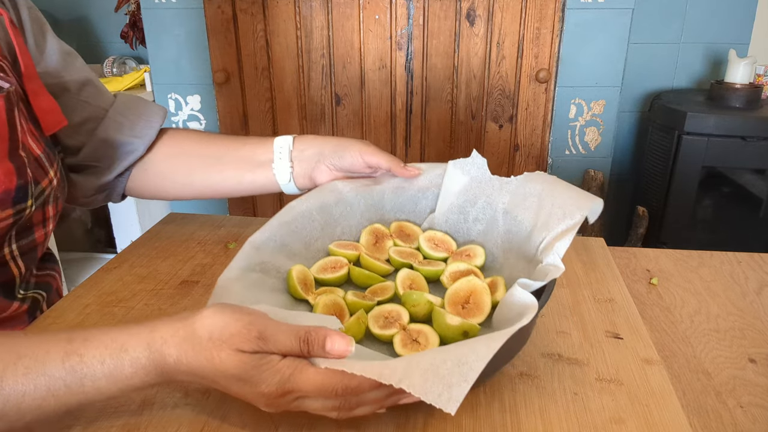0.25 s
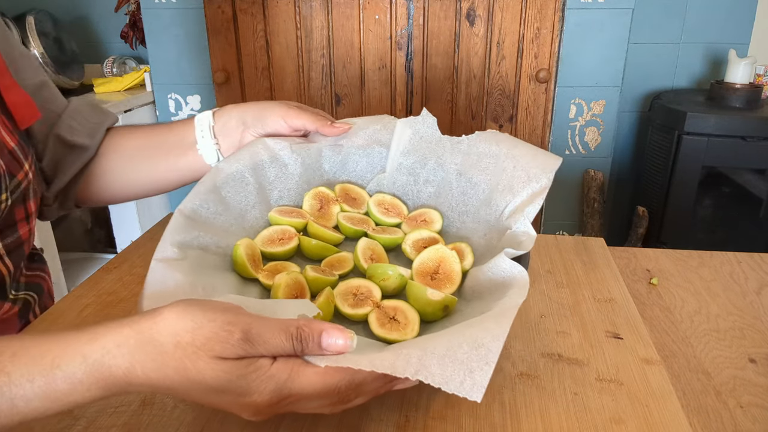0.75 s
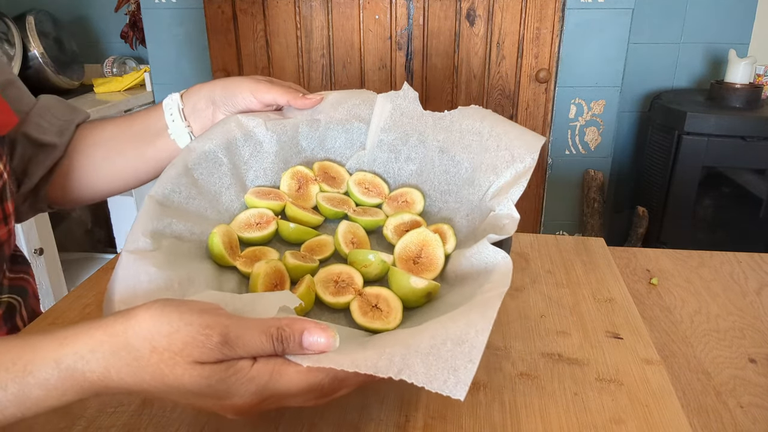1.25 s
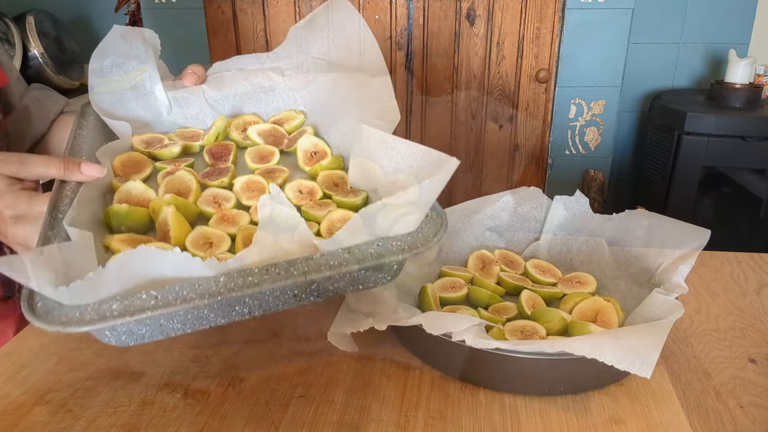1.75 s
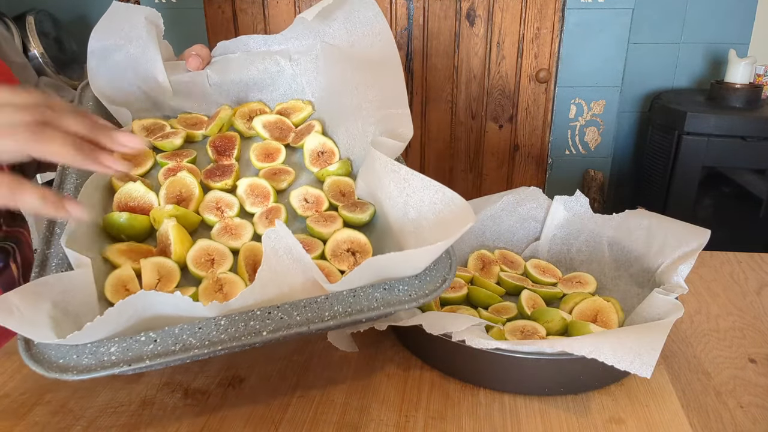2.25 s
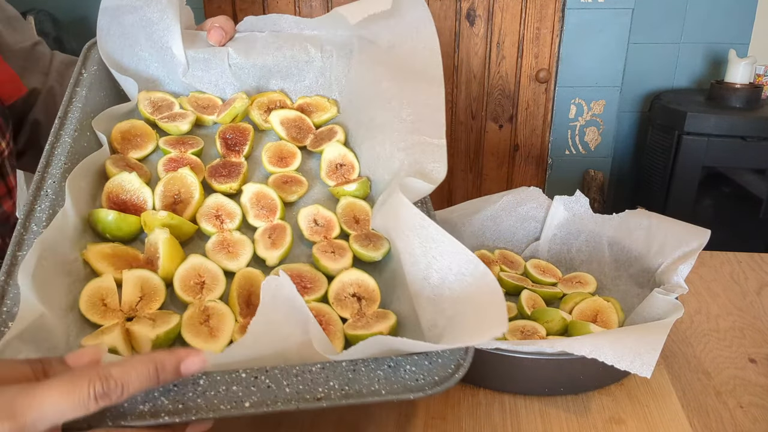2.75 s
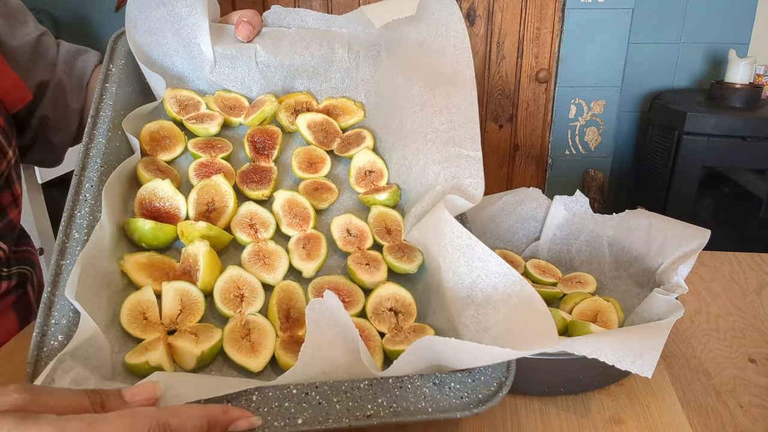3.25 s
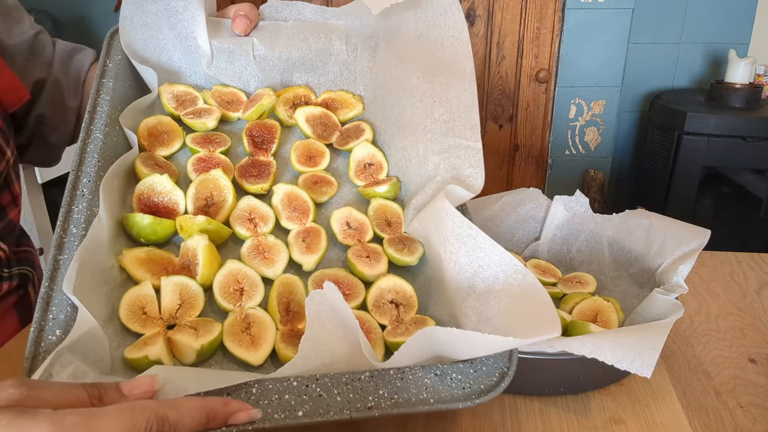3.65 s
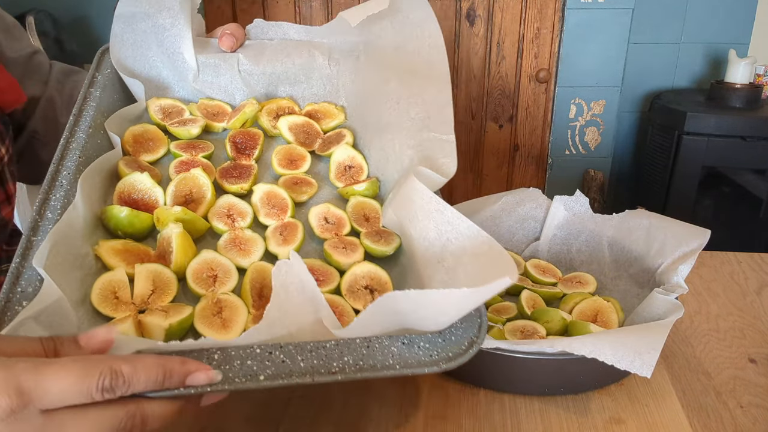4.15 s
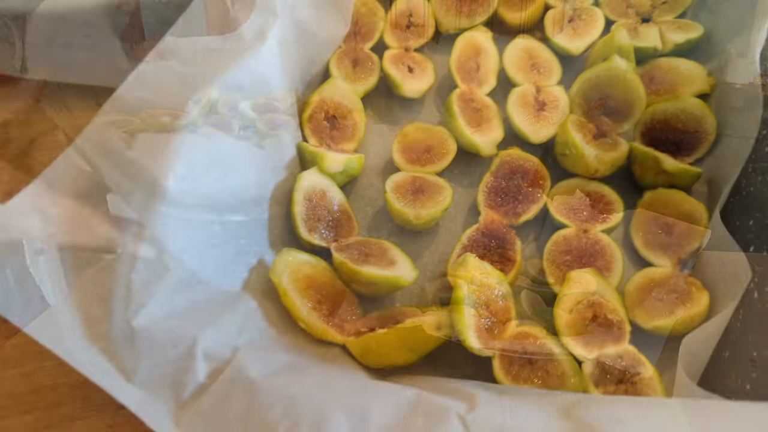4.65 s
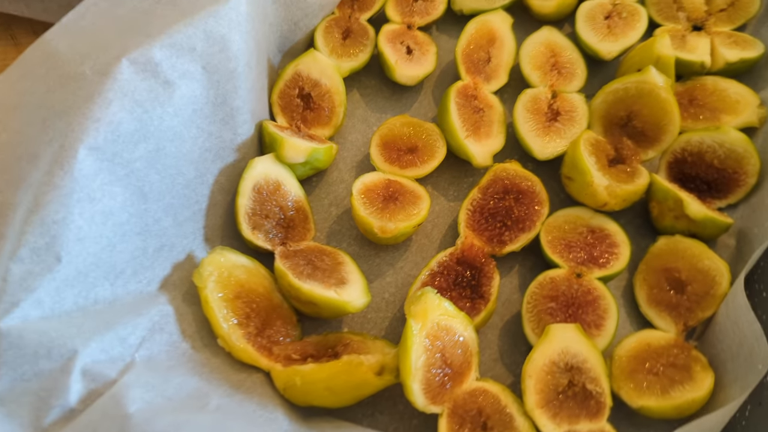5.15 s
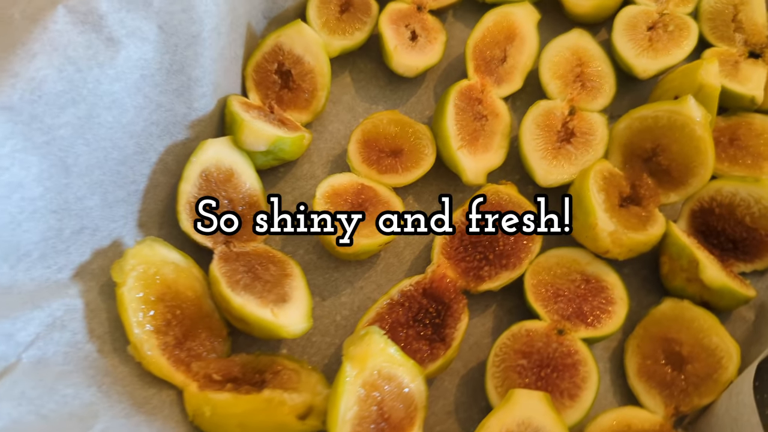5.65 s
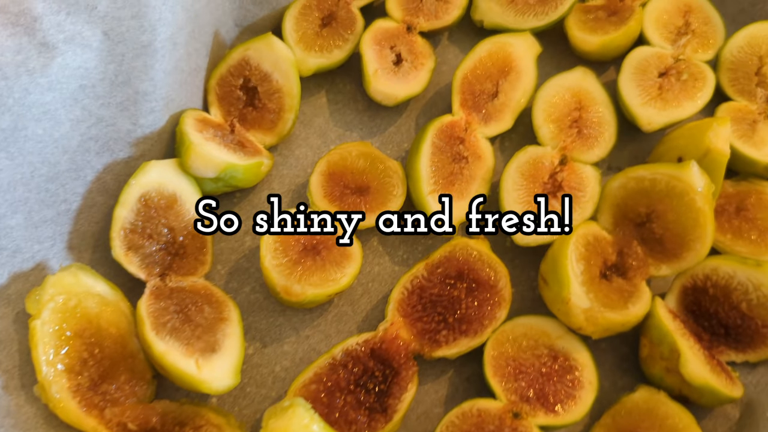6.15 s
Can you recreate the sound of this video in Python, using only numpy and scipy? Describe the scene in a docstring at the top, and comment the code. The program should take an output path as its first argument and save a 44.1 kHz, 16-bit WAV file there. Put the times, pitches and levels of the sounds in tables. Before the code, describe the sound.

Dry, crisp paper crinkling close to the microphones: sharp folding pops over a fine sliding crackle, the parchment rubbing on metal trays that give muffled knocks and a low boom. The strongest burst comes before halfway, then sparse rustles and a short final swish. Afterwards there is only faint appliance hum, air and hiss in a small live kitchen, with one tiny click near the end.

```python
"""Trays of cut fruit on baking parchment

Close by, metal trays of fruit are lifted and tilted over a kitchen table, heard by a pair of ears.
The parchment snaps in noise bursts shaped by each fold and slides in a fine crackle of tiny creases.
The trays boom as low noise and ring in damped modes; one small hard click comes near the end on the left.
Diffuse echoes give the hard-walled kitchen; wavering sines and noise give appliance hum, air and hiss."""
import sys
import numpy as np
from scipy import signal
from scipy.fft import rfft, irfft, next_fast_len
from scipy.io import wavfile
from scipy.ndimage import map_coordinates

SR = 44100
rng = np.random.default_rng(int(sys.argv[2]) if len(sys.argv) > 2 else 0)


def bounce(signal):
    """Save signal as a 16-bit WAV file at the path given by the first command-line argument."""
    frames = np.transpose(np.atleast_2d(signal))
    limited = np.clip(frames, -1, 1)
    pcm = np.round(limited * 32767).astype(np.int16)
    wavfile.write(sys.argv[1], SR, pcm)


N = 282636

# Large folds that snap through: (time [s], relative level [dB], fold pitch [Hz], body [dB], sheen [dB],
# time to crest [ms])
SNAPS = [(0.009, -43, 2000, -2, 1, 1), (0.026, -39.5, 2200, 5, -5, 1.4), (0.0582, -37.5, 1800, -5, -9, 1.3),
         (0.0675, -44, 3600, -6, 0.5, .7), (0.0849, -29.5, 1800, -6.5, 0, 0.5),
         (0.1004, -37, 3200, -6, -1, .6), (0.170, -35, 2320, -1, 1, 2.1), (0.220, -39.5, 4400, -3, 4, 1.5),
         (0.3195, -44, 5200, -9, 4, 0.69), (0.324, -29.8, 2610, 4.5, 1, 1.4),
         (0.36, -40, 4400, 7, -11, 1.3), (0.436, -41.5, 4660, 2, 4, 1.4), (0.456, -46, 2000, -2, 0, 1.4),
         (0.4703, -36.5, 1900, 3, 8, 1.15), (0.482, -37, 1650, -1.5, -12, 1.1),
         (0.662, -54, 2000, -6, 0, 1.8), (0.668, -42.5, 3600, -4, 5.5, 1.2),
         (0.8977, -36, 5350, -18, 4, 1.2), (0.908, -35, 2200, 0, -0.5, 1.7),
         (1.086, -47.8, 2770, 4, -2, 2.2), (1.288, -44, 1950, -5, -20, 1.3),
         (1.303, -37.5, 4000, -13, 1, 1.01), (1.380, -47, 5500, -4, 2, 2.4),
         (1.4376, -35, 3700, -4.5, -2, 1.5), (1.447, -43, 5195, -6, 7, 0.91),
         (1.4859, -39, 5800, -6, 4, 1.8), (1.522, -34.5, 2900, -14, -4, 1.3),
         (1.5415, -36.5, 1500, -9, -3, 1.6), (1.5595, -38.5, 1900, -8, -3, 2.4),
         (1.5687, -26, 1450, -8, -3, .8), (1.577, -36.5, 2300, -5, -5, 1),
         (1.585, -38.5, 1800, -5, -5, 1.2), (1.616, -38.5, 2400, -8, -4, 1.08),
         (1.629, -42, 3000, -6, 2, 1), (1.702, -38, 1950, -6, -5, 1.6), (1.7205, -42.5, 1750, -6, -10, 1.2),
         (1.729, -37, 3490, -13, -3, 1.2), (1.7543, -39.5, 5500, -6, 4, 1),
         (1.766, -36.5, 1700, -5, -4, 1.3), (1.8148, -30.3, 3300, -6, 2, 1.7),
         (2.023, -35, 2050, -11, -5.5, 1.1), (2.0586, -47, 1900, -9, -4, 1),
         (2.138, -46.5, 4660, -6, -1.5, 1.4), (2.419, -38, 2200, -3, 3, 2.9), (2.449, -32, 5200, 0, 0, 2.9),
         (2.458, -36.5, 1900, -2, 1, 1.6), (2.4753, -26.5, 6230, -10.5, 4, 1),
         (2.4785, -26.5, 5554, -5, 2, 1.3), (2.4983, -24.5, 2010, -6.5, 6, 1.5),
         (2.5283, -32, 5550, -9, 6, 1.7), (2.5435, -32, 2190, -7, -2.5, 1.2),
         (2.559, -35, 2300, -6, -4, 1.2), (2.566, -31.5, 5550, -7.5, 6.5, 1.3),
         (2.5774, -33.5, 1800, -6, 0, 1.4), (2.7064, -33.5, 2300, -3, -3, 1.4),
         (2.7095, -24.7, 1750, -2.5, 5, 1.56), (2.718, -38, 1700, -2, -2, 1.2),
         (2.7534, -33, 1490, 0.5, -5, 2), (2.771, -38, 5800, -6, 3.5, 1.2),
         (2.8542, -30.5, 5550, -12, 9, 1.4), (2.9017, -29, 3800, -2, -2.5, 1.2),
         (2.917, -37, 3800, -2, -2, 1.4), (2.9287, -26, 3100, 3, -1, 1.9),
         (2.9397, -37, 4200, -4, 3.5, 1.1), (2.9815, -37, 1950, -8, 0, 1.3),
         (2.9871, -26.5, 4200, -9, 4.5, 1.7), (3.049, -41, 4150, 0, 4, 1.6),
         (3.2144, -42.5, 5500, 3, 12.5, 1.4), (3.3526, -53.5, 2300, 6, -5, 2.4),
         (3.4625, -32, 2100, -2, 6.5, 1.7), (3.850, -43.3, 1400, -1, -9, 2.4),
         (3.8604, -49.5, 3200, 2, -4, 1.8), (3.875, -52, 1500, 0, -14, 2.1),
         (4.195, -51, 1900, -6, -14, 2.5), (4.2035, -44, 4400, -3.5, -1, 1.3),
         (4.224, -51, 1900, -4, -9, 2.4), (4.3315, -32, 2820, -2, -1, 1.5), (4.436, -39, 5500, -2, -1, 2),
         (4.444, -35, 4420, 0, 2, 2.4), (4.4495, -34, 3000, 2, 1, 2.2), (4.455, -38.5, 3800, 3, -1, 2),
         (4.472, -38.5, 4900, -6, -4, 1.9), (4.540, -47.5, 4940, -5, 6, 1.5),
         (4.867, -54.5, 5500, -4, 3, 1.4), (4.980, -61, 2000, 4, -2, 1.7), (5.035, -59.5, 5000, 5, 1, 2.2),
         (5.0494, -56, 3000, 3, 8, .8)]
# Slackness of the sliding sheet: (time [s], mean midrange gain [dB])
SLACKNESS = [(0, 0), (1.3, 1), (2.0, 0.5), (2.25, -1.5), (2.5, 2), (3.0, -0.5), (3.4, 1), (3.9, 0),
             (4.2, 0), (4.4, -4)]
# Soft bumps of hand and fruit on the tray: (time [s], relative level [dB], reach of the contact [Hz])
BUMPS = [(.326, -54, 1300), (2.447, -48, 900), (2.468, -46, 900), (2.712, -47, 1800), (2.932, -47, 2200),
         (3.20, -56, 800), (3.28, -56, 800), (3.464, -50.5, 1000), (4.335, -58, 500), (4.443, -47, 700)]
# Modes of the loaded tray: (frequency [Hz], relative level [dB], t60 [s])
TRAY_MODES = [(299, -9.5, 0.13), (365, -3, .17), (425, -1.5, .15), (545, -4, .15), (771.7, 2, .19),
              (937, -2, .17), (1285, -4, .16), (1800, -1, .13), (2406, -2, .11), (3095, -3, .11),
              (3472, -2, .11), (3955, -4, .07), (6087, -1, .09)]
# A small hard click: (time [s], relative level [dB], time to crest [ms], pitch [Hz], body [dB], sheen [dB],
# right ear lag [ms], relative room level [dB])
CLICK = (6.1647, -39, 1.2, 3050, -1, 6.5, 0.1, 0)
# Colour of a buckling sheet: (frequency [Hz], relative level [dB per Hz])
BUCKLING_COLOUR = [(100, -33), (300, -12), (550, -3.5), (780, -1), (1000, -3), (1300, 0.5), (1900, 1),
                   (2800, -2.5), (3900, -2), (5100, -3), (6700, -2.2), (8000, -9.5), (12000, -12),
                   (16000, -15.8)]
# Colour of a sliding sheet: (frequency [Hz], relative level [dB per Hz])
SLIDING_COLOUR = [(100, -28), (300, -10), (550, -4), (780, -3.5), (1000, -5.5), (1250, 1), (1900, 1),
                  (2800, -2), (3900, -2.5), (5200, -5.5), (6700, -4.5), (8000, -10), (12000, -14.5),
                  (16000, -18)]
# Colour of the trays' boom: (frequency [Hz], relative level [dB per Hz])
BOOM_COLOUR = [(25, -42), (58, -17), (72, -5.5), (80, -3), (87, 5.5), (96, -5.5), (125, -12), (158, -7),
               (195, -18), (280, -20.5), (400, -18.5), (560, -18), (800, -21), (1300, -34.5), (2500, -56)]
# Colour of still kitchen air: (frequency [Hz], relative level [dB per Hz])
AIR_COLOUR = [(20, -30), (45, -3), (90, -1), (170, -2.5), (270, -4), (400, -5), (520, -12.5), (750, -14),
              (1200, -23.5), (2500, -30.5), (5000, -35), (16000, -52)]
# Colour of a faint electronic hiss: (frequency [Hz], relative level [dB per Hz])
HISS_COLOUR = [(1000, -6.5), (4800, -4.5), (6000, 1.5), (7600, -8), (8300, -7), (8800, 3), (9800, -10.5),
               (11000, -8), (11500, -1), (11900, -5), (12800, 1.5), (14500, -6), (16000, -6)]
# Appliance hum: (frequency [Hz], relative rms level [dB])
HUM_TONES = [(107.7, -72.5), (215.3, -68), (344.5, -71), (371.4, -66), (597.5, -80), (748.3, -81.5)]
# The steady background grows louder towards the end: (time [s], gain [dB])
BACKGROUND_GAIN = [(0, -5.5), (4.3, -5), (4.75, 0), (6.41, 0)]
# Likeness of the two ears in the room: (frequency [Hz], coherence [0-1])
EAR_COHERENCE = [(60, .95), (130, 0.95), (290, 0.81), (640, 0.6), (1000, 0.41), (1500, 0.29), (3000, .05),
                 (15000, .03)]
# The kitchen's ring: (frequency [Hz], t60 [s])
KITCHEN_T60 = [(200, .4), (800, .42), (2000, .48), (5500, 0.41), (9000, 0.35), (15000, 0.27)]
# Where the handled paper is: (time [s], mean right ear lag [ms])
PAPER_PLACE = [(0, -0.078), (1.1, -0.041), (1.3, 0.098), (2.9, .05), (3.9, -0.077), (4.4, 0.066)]
# Pushes that make the paper slide and crease: (crest time [s], relative level [dB], rise [s], fall [s],
# creasing [0-1], tautness [0-1])
SLIDES = [(.11, -46.5, .9, 0.17, 0.88, 0.8), (.37, -51.5, 0.31, 0.23, 0.79, 0.8),
          (.78, -70, .3, 0.47, 0.65, 0.5), (1.44, -47.5, 0.14, 0.24, .8, .9),
          (1.59, -46.5, .17, 0.13, .95, 1), (1.76, -48, 0.19, 0.23, .8, 1),
          (2.03, -58.5, 0.81, .2, .3, 0.91), (2.22, -53.5, .22, 0.17, 0.1, 0.78),
          (2.464, -37, 0.049, 0.1, 0.74, 1), (2.59, -48, .1, 0.28, .9, 1), (2.73, -47.5, .3, 0.3, .9, 1),
          (2.93, -55, 0.23, .17, 1, .8), (3.26, -57.8, 0.44, 0.43, 0.5, 0.1),
          (3.5, -56.5, .04, .2, .5, 0.3), (3.7, -69.5, .2, 0.27, .6, .1), (3.88, -57.5, 0.046, 0.13, .4, 0),
          (3.99, -58.5, 0.21, 0.21, 0.2, 0), (4.23, -58, .06, .15, .2, 0),
          (4.345, -41.3, 0.14, 0.16, .05, 1), (4.446, -39, .045, 0.029, .1, 1),
          (5.66, -70, 0.25, 0.18, 0.52, .15)]
# The trays flex as the grip shifts: (crest time [s], relative level [dB], rise [s], fall [s])
FLEXES = [(2.47, -52, 1.3, .6), (2.66, -51, .3, .2), (2.97, -53.5, 0.22, 0.67), (3.28, -56.5, 0.24, 1.2),
          (4.1, -53, 0.33, 0.18), (4.45, -57, .6, 0.32)]
# Boom of a tray that is only held: (time [s], relative level [dB])
HELD_BOOM = [(0, -66), (1, -70), (4.5, -69.5), (5.3, -76), (6.41, -73)]
# What the small hard thing rings with: (frequency [Hz], relative level [dB])
CLICK_MODES = [(1700, -9), (2340, -1), (4620, -8), (6230, -5), (6950, -5), (10000, -2), (12500, 0)]

TOP_HZ = 16000  # upper band limit
# Rise and fall are the times in which a movement changes by SWELL_DB; paper settles between pushes
SWELL_DB, SETTLE_DB = 20, -82.5
# Every fold: relative level of the room's answer [dB], scatter of its ear lag [ms]
FOLD_ROOM_DB, LAG_SCATTER_MS = -4, .04
# Small folds: chances a second, level over the slide [dB], its scatter [dB]
SMALL_RATE, SMALL_OVER_DB, SMALL_SCATTER_DB = 30, 3.5, 2
# Least slide level that starts them, cap on their level before scatter [dB]
SMALL_FROM_DB, SMALL_TOP_DB = -56, -42
# Their middle pitch [Hz], its scatter [octaves], body [dB], sheen [dB], time to crest [ms]
SMALL_HZ, SMALL_OCTAVES, SMALL_BODY_DB, SMALL_SHEEN_DB, SMALL_CREST_MS = 3300, 0.59, -3.5, .5, .8
# Tiny creases: chances a second, level over the slide [dB], spread of sizes [dB]
CREASE_RATE, CREASE_DB, CREASE_SPREAD_DB = 130, 1.5, 3.8
# Their middle pitch [Hz], its scatter [octaves], life [cycles]
CREASE_HZ, CREASE_OCTAVES, CREASE_CYCLES = 3000, .8, 2
# After a snap the fold goes on creasing: level under the snap [dB], time to die away by 60 dB [s]
RELAX_DB, RELAX_T60 = -18, .3


def crinkle(right_db=.5, count=5):
    """Folds snap one by one, answered from a few places on the sheet, a little stronger on the right."""
    out = np.zeros((2, N))
    places = [kitchen() for _ in range(count)]
    for k, (s, db, fold_hz, body_db, sheen_db, crest_ms) in enumerate(SNAPS + small_folds()):
        lag_ms = np.interp(s, *np.transpose(PAPER_PLACE)) + LAG_SCATTER_MS * rng.standard_normal()
        fold = snap(places[k % count], db, crest_ms, fold_hz, body_db, sheen_db, lag_ms, FOLD_ROOM_DB)
        add(out, s, fold)
    return out * amp([[-right_db], [right_db]])


def snap(room, db, crest_ms, fold_hz, body_db, sheen_db, lag_ms, room_db, width=0.57,
         flutter_db=-18, flutter_life=.004, fold_db=7.3, fold_octaves=0.32, lumpy_db=2.9,
         apart=.45, wet_db=-.5, size=1024):
    """One fold buckles: a short burst of tiny jumps rings the facet, then the sheet flutters out."""
    t, hz = np.arange(1, size + 1) / SR, np.fft.rfftfreq(size, 1 / SR)
    age = t * 1000 / crest_ms  # 1 at the crest
    burst = np.exp(-.5 * (np.log(age) / width) ** 2)
    flutter = amp(flutter_db) * np.exp(-t / flutter_life)
    common, uneven = rng.standard_normal((2, size)) * (burst + flutter)

    # body lies below the fold's own pitch, sheen above it
    knee_hz = np.clip(fold_hz, 1800, 5200)
    tilt = [(900, body_db), (.85 * knee_hz, 0), (1.35 * knee_hz, 0), (9000, sheen_db)]
    sheet_db = along(BUCKLING_COLOUR, hz) + along(tilt, hz)
    # each facet has one main resonance and a few chance ones
    facet_db = fold_db * np.exp(-.5 * (np.log2((hz + 1) / fold_hz) / fold_octaves) ** 2)
    lumps_db = lumpy_db * np.interp(hz, np.geomspace(500, TOP_HZ, 64), rng.standard_normal(64))

    # short waves radiate unevenly, so the two ears get partly different treble
    side = apart * along([(600, .4), (4000, 1.24)], hz) * rfft(uneven)
    ears = rfft(common) + np.array([side, -side])
    delay = np.maximum([[-lag_ms], [lag_ms]], 0) / 1000  # left and right, in s
    lagged = np.exp(-2j * np.pi * hz * delay)
    direct = irfft(ears * causal(amp(sheet_db + facet_db + lumps_db)) * lagged)

    # the room hears all directions at once, a smoother colour
    room_colour_db = 0.68 * sheet_db + 0.28 * along(SLIDING_COLOUR, hz) + .5 * facet_db + .8 * lumps_db
    spread = irfft(causal(amp(room_colour_db)))
    sound = echo(unit(spread), room) * amp(room_db + wet_db)
    sound[:, :size] += unit(direct)
    return amp(db) * np.sqrt(.005 * SR / size) * sound


def small_folds():
    """Folds give way by chance where the sheet creases, louder in a harder slide; rows as in SNAPS."""
    level_db, (creasing, _) = swells(SLIDES, SETTLE_DB), handling()
    chance, scatter = rng.random((400, 2)), rng.standard_normal((400, 2))
    folds = []
    for k, ((when, stiffness), (size, pitch)) in enumerate(zip(chance, scatter)):
        s = (k + when) / SMALL_RATE
        i = int(s * SR)
        if i < N and level_db[i] > SMALL_FROM_DB and creasing[i] > stiffness:
            db = min(level_db[i] + SMALL_OVER_DB, SMALL_TOP_DB) + SMALL_SCATTER_DB * size
            fold_hz = SMALL_HZ * 2 ** (SMALL_OCTAVES * pitch)
            folds.append((s, db, fold_hz, SMALL_BODY_DB, SMALL_SHEEN_DB, SMALL_CREST_MS))
    return folds


def rustle(rate=320, spread_db=4.5, direct_db=-5, room_db=-4.2, dull_hz=5000,
           flap_hz=1700, flap_octaves=.6, restless_db=2):
    """Sliding paper: a dense crackle of tiny creases over the rub of the sheet on the tray."""
    creasing, taut = handling()
    sizes = amp(spread_db * np.minimum(rng.exponential(size=N), 3.5))
    creases = (rng.random(N) < rate / SR) * sizes ** 2
    t = np.arange(SR // 100) / SR
    burst_power = signal.oaconvolve(creases, t * np.exp(-t / .0003))[:N]
    bursts = unit(np.sqrt(np.abs(burst_power)))
    # bursts of creasing mix by power with the even rub
    rough = np.sqrt(creasing * bursts ** 2 + 1 - creasing) * rng.standard_normal((2, N))
    bright = unit(filtered(rough, lambda hz: amp(along(SLIDING_COLOUR, hz))))

    # a slack sheet flaps in the midrange, a taut one hisses
    flap = filtered(bright, lambda hz: np.exp(-.5 * (np.log2((hz + 1) / flap_hz) / flap_octaves) ** 2))
    bright = bright + flap * (amp(curve(SLACKNESS) + restless_db * wobble(25)) - 1)
    dull = filtered(bright, lambda hz: 1 / np.sqrt(1 + (hz / dull_hz) ** 4))
    mid, side = (dull + taut * (bright - dull)) * amp(swells(SLIDES, SETTLE_DB))
    direct = np.array([mid + .5 * side, mid - .5 * side])
    return amp(direct_db) * direct + amp(room_db) * echo((mid + side) / np.sqrt(2), kitchen())


def crackle(room_db=-6, low_hz=700, pan_db=2.5, size=256):
    """Tiny creases tick, each at its own pitch, while the sheet slides and just after a fold has snapped."""
    out, t = np.zeros((2, N)), np.arange(size) / SR
    slide = amp(swells(SLIDES, SETTLE_DB)) * np.sqrt(handling()[0])
    snap_s, snap_db, *_ = np.transpose(SNAPS)
    chance, scatter = rng.random((4000, 2)), rng.standard_normal((4000, 2))
    times = np.cumsum(-np.log(chance[:, 0])) / CREASE_RATE  # exponential waits
    for s, luck, (pitch, side) in zip(times, chance[:, 1], scatter):
        if s * SR >= N:
            break
        past = snap_s < s
        relax_db = RELAX_DB + snap_db[past] - 60 * (s - snap_s[past]) / RELAX_T60
        strength = np.sqrt(slide[int(s * SR)] ** 2 + np.sum(amp(relax_db) ** 2))
        strength *= amp(CREASE_DB + CREASE_SPREAD_DB * min(-np.log(luck), 3))
        cycles = t * min(CREASE_HZ * 2 ** (CREASE_OCTAVES * pitch), TOP_HZ)
        tick = strength * np.sin(2 * np.pi * cycles) * np.exp(-cycles / CREASE_CYCLES)
        add(out, s, tick * amp([[pan_db * side], [-pan_db * side]]))
    # such small creases radiate little bass
    out = filtered(out, lambda hz: hz ** 2 / (hz ** 2 + low_hz ** 2))
    return out + amp(room_db) * echo(out.mean(0), kitchen())


def handling():
    """Creasing and tautness of the sheet, 0-1, passing from one push to the next."""
    s, _, _, _, *states = np.transpose(SLIDES)
    return [np.clip(np.interp(np.arange(N) / SR, s, state), 0, 1) for state in states]


def swells(moves, rest_db):
    """Level in dB of movements whose powers rise and fall over a resting level."""
    t = np.arange(N) / SR
    power = amp(rest_db) ** 2
    for s, db, rise, fall, *_ in moves:
        power = power + amp(db - SWELL_DB * np.maximum((s - t) / rise, (t - s) / fall)) ** 2
    return 10 * np.log10(power)


def on_tray(paper, through_db=-.5, coupling_db=-6):
    """The tray's modes, as damped resonators, ring along with the paper that lies against it."""
    # a mode's bandwidth in Hz follows from its t60
    modes = [(f, db, np.log(1000) / (np.pi * t60)) for f, db, t60 in TRAY_MODES]

    def walls(hz):
        return sum(amp(db) * 1j * hz * width / (f * f - hz * hz + 1j * hz * width)
                   for f, db, width in modes)

    return filtered(paper, lambda hz: amp(through_db) + amp(coupling_db) * walls(hz))


def trays(boom_db=1.5, attack=.004, room_db=-2):
    """The trays flex with a low boom; soft bumps ring modes that the fruit damps."""
    ring, t = np.zeros(N), np.arange(SR // 2) / SR
    for s, db, reach_hz in BUMPS:
        for hz, level, t60 in TRAY_MODES:
            # a soft contact hardly moves the higher modes
            size = amp(db + level + rng.normal(0, 2.4) - 3) / np.sqrt(1 + (hz / reach_hz) ** 4)
            decay = amp(-60 * t / t60) * (1 - np.exp(-t / attack))
            add(ring, s, size * decay * np.sin(2 * np.pi * (hz * t + rng.random())))
    boom = amp(swells(FLEXES, curve(HELD_BOOM)) + boom_db) * noise(BOOM_COLOUR)
    return boom + 0.74 * ring + amp(room_db) * echo(ring, kitchen())


def click(low_hz=2200, left_db=1.0, ring_db=-45, ring_t60=.007, ring_room_db=2, ring_direct_db=-15):
    """Something small and hard clicks on the left and rings briefly, too small to radiate bass."""
    out, room, t = np.zeros((2, N)), kitchen(), np.arange(SR // 20) / SR
    s = CLICK[0]
    knock = snap(room, *CLICK[1:], width=0.96, fold_db=8.5, fold_octaves=0.27, lumpy_db=1.5, apart=.7)
    add(out, s, filtered(knock, lambda hz: hz ** 3 / np.sqrt(hz ** 6 + low_hz ** 6)))
    ring = sum(amp(ring_db + db - 60 * t / ring_t60) * np.sin(2 * np.pi * (hz * t + rng.random()))
               for hz, db in CLICK_MODES)
    add(out, s, amp(ring_direct_db) * ring)
    add(out, s, amp(ring_room_db) * echo(ring, room))
    return out * amp([[left_db], [-left_db]])


def background(air_db=-59.5, hiss_db=-76.0, hum_db=-.5, waver_db=2, drift=.5):
    """A slightly unsteady hum, its tones drifting in level and phase, in room air over a faint hiss."""
    t = np.arange(N) / SR
    hum = np.zeros(N)
    for hz, db in HUM_TONES:
        level = np.sqrt(2) * amp(db + waver_db * wobble(4))  # rms to peak
        hum += level * np.sin(2 * np.pi * hz * t + drift * wobble(5))
    steady = amp(hum_db) * hum + amp(air_db) * noise(AIR_COLOUR) + amp(hiss_db) * noise(HISS_COLOUR)
    return amp(curve(BACKGROUND_GAIN)) * steady


def kitchen(gap=.005, early_db=3, early_life=.02):
    """The room's answer to an impulse: table and near walls first, then an even tail."""
    hz, t, z = signal.stft(rng.standard_normal((2, 2 * SR // 5)), SR, nperseg=256)
    # each frequency dies away at its own pace
    tail = signal.istft(z * amp(-60 * t / along(KITCHEN_T60, hz)[:, None]), SR, nperseg=256)[1]
    t = np.arange(tail.shape[1]) / SR
    onset = 1 - np.exp(-(t / gap) ** 2)
    tail = diffuse(tail * onset * amp(early_db * np.exp(-t / early_life)))
    return tail / np.linalg.norm(tail[0])


def echo(x, room):
    """A mono sound heard through a two-eared room answer."""
    return signal.oaconvolve(x[None], room, axes=1)[:, :N]


def diffuse(pair):
    """Two unrelated noises become a room field: alike in the bass, unrelated in the treble."""
    def turn(hz):
        return np.arccos(np.clip(along(EAR_COHERENCE, hz), -1, 1)) / 2

    mid, side = filtered(pair, lambda hz: np.array([np.cos(turn(hz)), np.sin(turn(hz))]))
    return np.array([mid + side, mid - side])


def noise(spectrum):
    """Coloured room noise of rms 1."""
    white = rng.standard_normal((2, N))
    return unit(filtered(diffuse(white), lambda hz: amp(along(spectrum, hz))))


def amp(db):
    """Decibels to gain."""
    return 10 ** (np.asarray(db) / 20)


def unit(x):
    """Scale to rms 1."""
    return x / np.sqrt(np.mean(x ** 2) + 1e-20)


def along(points, hz):
    """(frequency [Hz], value) points read on a log axis."""
    f, v = np.transpose(points)
    return np.interp(np.log(hz + 1), np.log(f + 1), v)


def curve(rows):
    """(time [s], value) rows to one value per sample."""
    return np.interp(np.arange(N) / SR, *np.transpose(rows))


def wobble(rate):
    """A smooth random curve, rate knots a second."""
    knots = rng.standard_normal(int(N * rate / SR) + 4)
    return map_coordinates(knots, [np.arange(N) * rate / SR])


def filtered(x, response):
    """x with its spectrum multiplied by a response of frequency."""
    n = x.shape[-1]
    m = next_fast_len(n + SR // 5)
    return irfft(rfft(x, m) * response(np.fft.rfftfreq(m, 1 / SR)), m)[..., :n]


def causal(gain):
    """Minimum-phase response with the given gains, by folding the cepstrum."""
    cep = irfft(np.log(np.maximum(gain, 1e-6)))
    half = len(cep) // 2
    cep[1:half] *= 2
    cep[half + 1:] = 0
    return np.exp(rfft(cep))


def add(track, s, sound):
    """Mix a sound into a track at time s."""
    start = max(round(s * SR), 0)
    part = sound[..., :max(N - start, 0)]
    track[..., start:start + part.shape[-1]] += part


def scene():
    """Paper on its trays, the trays themselves and one late click, over the kitchen's background."""
    paper = rustle() + crinkle() + crackle()
    return on_tray(paper) + trays() + background() + click()


def record(dry):
    """The camera's microphone channel falls off very steeply above its band limit."""
    return filtered(dry, lambda hz: 1 / np.sqrt(1 + (hz / TOP_HZ) ** 160))


dry = scene()
out = record(dry)
bounce(out)
```